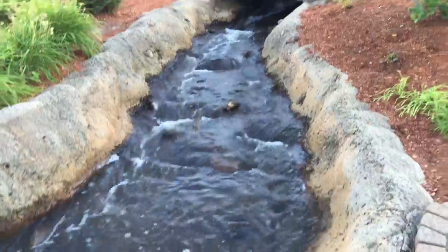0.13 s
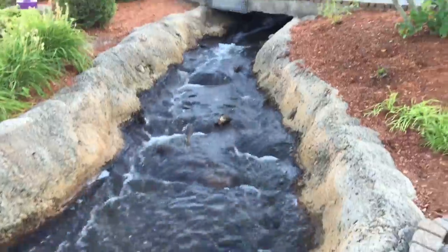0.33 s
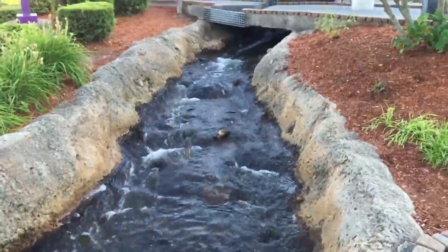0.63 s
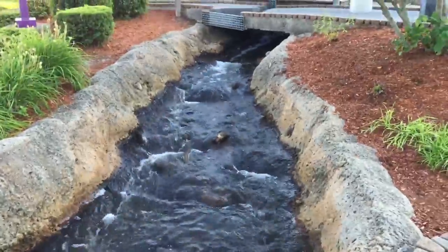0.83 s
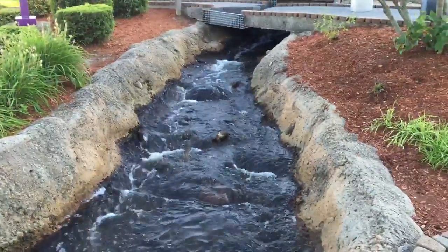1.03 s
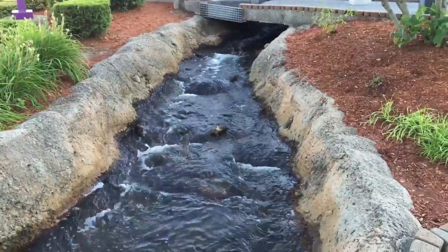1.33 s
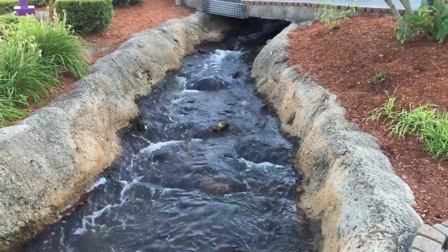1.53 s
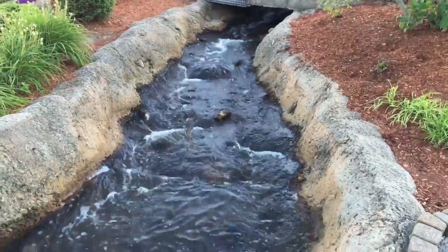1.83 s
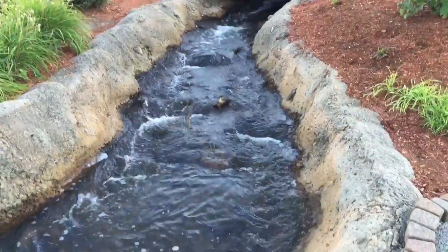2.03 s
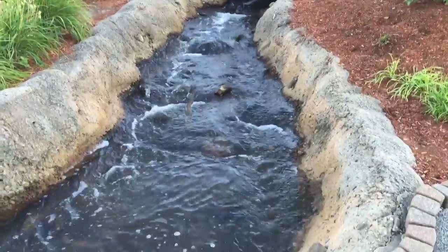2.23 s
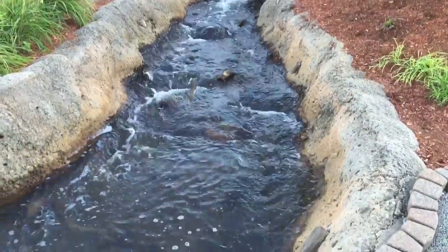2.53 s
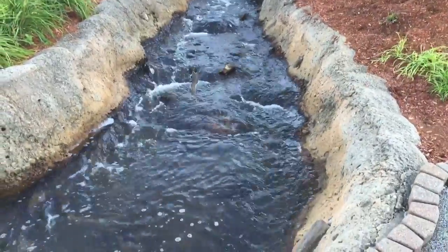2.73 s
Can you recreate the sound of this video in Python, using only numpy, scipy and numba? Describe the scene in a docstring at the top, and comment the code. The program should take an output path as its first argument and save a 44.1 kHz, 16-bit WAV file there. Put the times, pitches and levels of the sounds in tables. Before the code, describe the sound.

Stream water rushes steadily between rocks, with small gurgles and soft handling thumps at the microphone.

```python
"""Water runs down a shallow concrete stream between rocks, a few metres from a hand-held mono phone.
Its even rush is filtered noise and dense tiny bursts; its bubbles are decaying sines rising in pitch.
Light wind is low noise with short pulsed swings at the microphone; two low drones are sines that waver.
The hand knocks the phone now and then: damped swings that fall in pitch. A short silence comes first."""
import sys
import numpy as np
from scipy import signal
from scipy.fft import rfft, irfft
from scipy.io import wavfile
from scipy.ndimage import uniform_filter1d
from numba import njit

SR = 44100
rng = np.random.default_rng(int(sys.argv[2]) if len(sys.argv) > 2 else 0)


def gain_from_db(level_db):
    """Turn a decibel level (scalar or array-like) into a linear amplitude factor."""
    decades = np.asarray(level_db, float) / 20
    return 10 ** decades


def generate_wav(sig):
    """Save sig (samples, or channels by samples) to the path in sys.argv[1] as 16-bit PCM at SR."""
    pcm = np.round(np.clip(np.atleast_2d(sig).T, -1, 1) * 32767).astype(np.int16)
    wavfile.write(sys.argv[1], SR, pcm)


N = 127008  # samples, 2.88 s


def unit(x):
    """Normalisation: divides a signal by its root mean square, so that its rms is 1."""
    return x / np.sqrt(np.mean(x ** 2))


def curve(table):
    """Linear interpolation: a (time [s], value) table read at every sample."""
    return np.interp(np.arange(N) / SR, *np.array(table, float).T)


def gains(table, hz):
    """Frequency response: amplitude gain of a (frequency [Hz], level [dB]) table, on a log pitch axis."""
    points_hz, points_db = np.array(table).T
    return gain_from_db(np.interp(np.log(hz + 1), np.log(points_hz), points_db))


def walk(rate):
    """Slow random modulation: values held for 1 / rate seconds, smoothed twice, with rms 1."""
    hold = int(SR / rate)
    steps = np.repeat(rng.standard_normal(N // hold + 1), hold)
    smooth = uniform_filter1d(uniform_filter1d(steps, hold), hold)
    return unit(smooth[:N])


@njit
def rings(start, hz, cycles, glide, size, length):
    """Free damped oscillation: each bubble is an exponentially decaying sine that rises in pitch."""
    out = np.zeros(length)
    for k in range(len(start)):
        n = cycles[k] * SR / hz[k]  # samples until the ring is cut off, at exp(-5)
        phase = 0.
        for i in range(min(int(n), length - start[k])):
            phase += 2 * np.pi * hz[k] * (1 + glide * i / n) / SR
            out[start[k] + i] += size[k] * np.exp(-5 * i / n) * np.sin(phase)
    return out


def rush():
    """Superposition of random sources: noise and tiny bursts in bands that swell together and flicker alone."""
    # noise spectrum of the rush, relative: (frequency [Hz], density [dB per Hz])
    spectrum = [(240, -16), (400, -8), (495, -6), (543, -3.5), (693, -1.5), (1110, -1), (1470, 0.5),
                (3240, -5.5), (4500, -8.5), (4900, -11.5), (5400, -9), (6160, -8.5), (7630, -11.5),
                (9160, -10), (10000, -13), (10450, -16), (11000, -13), (13200, -13.5), (15300, -16.5)]
    # flow of the water, used as departures from its mean: (time [s], level [dB])
    flow_table = [(0.1, -37.5), (0.16, -38.5), (0.9, -37.5), (1.47, -38.5), (2.24, -36.5), (2.43, -38),
                  (2.88, -38)]
    level_db, fizz_per_s, fizz_scatter_db = -35.5, 6000, 1.5
    fizz_share = 0.24  # of the power; the rest is hiss
    swell_db, flicker_db = .5, .8  # rms

    draws = rng.random((int(fizz_per_s * N / SR), 3))
    places = (draws[:, 0] * N).astype(int)
    signs = np.sign(draws[:, 1] - .5)
    sizes = gain_from_db(-fizz_scatter_db * np.log(1 - draws[:, 2]))
    fizz = np.bincount(places, signs * sizes, N)
    hiss = rng.standard_normal(N)
    source = np.sqrt(fizz_share) * unit(fizz) + np.sqrt(1 - fizz_share) * hiss

    hz = np.arange(N // 2 + 1) * SR / N
    shaped = rfft(source) * gains(spectrum, hz)
    out, swell = 0, swell_db * walk(12)
    for octave in np.arange(7.5, 14.6, .5):  # log2 of the band centre in Hz
        window = np.cos(np.pi * np.clip(np.log2(hz + 1) - octave, -.5, .5)) ** 2
        band = irfft(shaped * window, N)
        out = out + band * gain_from_db(swell + flicker_db * walk(10))
    flow = curve(flow_table)
    return unit(out) * gain_from_db(level_db + flow - flow.mean())


def bubbles():
    """Bubble resonance: many small bubbles, spread evenly in log pitch, and a few louder single ones."""
    # louder single bubbles: (start [s], level [dB], starting pitch [Hz], ring [s])
    plops = [(.645, -33, 1986, 0.055), (.795, -37, 1860, .05), (.8, -33, 803, .04),
             (.905, -33.5, 1745, .09), (1.078, -33, 1980, 0.045), (1.56, -28.5, 804, 0.038),
             (1.685, -33, 1640, .04), (1.945, -29, 680, 0.032), (2.01, -39, 560, 0.071),
             (2.05, -39, 810, .04), (2.16, -32.5, 700, 0.058), (2.41, -33, 760, 0.053)]
    # liveliness of the gurgling, added to the small bubbles' level: (time [s], level [dB])
    gurgle = [(.1, -0.5), (.5, -2), (.85, -0.5), (1.2, 0.5), (1.55, -1), (1.8, -0.5), (2.0, 0), (2.25, 2.5),
              (2.5, -1.5), (2.88, 0)]
    per_s, low_hz, high_hz, mean_cycles = 500, 560, 6020, 26
    level_db, scatter_db, loudest_db = -43.5, 2, 8  # scatter and limit come before scaling to rms 1
    small_glide, plop_glide = .15, 0.009  # relative rise in pitch over one ring

    draws = rng.random((int(per_s * N / SR), 4))
    start = (draws[:, 0] * N).astype(np.int64)
    pitch = low_hz * (high_hz / low_hz) ** draws[:, 1]
    cycles = mean_cycles * (.5 + draws[:, 2])
    size = gain_from_db(np.minimum(-scatter_db * np.log(1 - draws[:, 3]), loudest_db))
    small = rings(start, pitch, cycles, small_glide, size, N)

    s, db, hz, ring = np.array(plops, float).T
    single = rings((s * SR).astype(np.int64), 1. * hz, hz * ring, plop_glide, gain_from_db(db), N)
    return unit(small) * gain_from_db(level_db + curve(gurgle)) + single


def wind():
    """Turbulent pressure: fluttering low noise, and single eddies that swing the diaphragm briefly."""
    # noise spectrum of the wind on the microphone, relative: (frequency [Hz], density [dB per Hz])
    spectrum = [(13, -57), (22, -5), (69, -0.5), (113, -11), (134, -15.5), (171, -8), (249, -14.5),
                (480, -29), (620, -43), (1060, -120)]
    # strength of the wind, before the lift below: (time [s], level [dB])
    breeze = [(0.12, -40.5), (0.26, -43.5), (0.33, -43.5), (0.63, -40.5), (0.8, -40), (0.95, -40),
              (1.66, -39.5), (1.76, -42.5), (2.16, -41.5), (2.37, -44), (2.51, -43), (2.76, -41.5),
              (2.88, -41)]
    # buffets under Gaussian envelopes: (centre [s], peak [dB], frequency [Hz], half-length to 1/e [s])
    buffets = [(.09, -22.5, 91, 0.011), (.14, -21, 84, 0.0083), (0.271, -19.5, 85.4, 0.0069),
               (.305, -19, 60.4, 0.0067), (0.412, -25, 55.4, 0.025), (0.496, -20, 80, 0.019),
               (.521, -13.5, 76.4, 0.0054), (0.867, -28, 52.7, 0.044), (0.952, -25.5, 64.7, 0.0099),
               (1.013, -22.5, 65, 0.013), (1.092, -16, 80, 0.0091), (1.344, -26, 93, 0.021),
               (1.456, -14.5, 80, 0.0078), (1.481, -24.5, 80, 0.0068), (1.74, -22.5, 81.6, 0.035),
               (1.82, -28, 167, 0.0088), (1.94, -35.5, 166.6, 0.024), (2.115, -34.5, 171, 0.0084),
               (2.139, -28.5, 70.6, .04), (2.489, -25.5, 61, 0.038)]
    lift_db, flutter_db = 5, 2  # flutter is rms

    hz, t = np.arange(N // 2 + 1) * SR / N, np.arange(N) / SR
    noise = irfft(rfft(rng.standard_normal(N)) * gains(spectrum, hz), N)
    rumble = unit(noise * gain_from_db(flutter_db * walk(20)))
    eddies = 0
    for s, db, f, long in buffets:
        envelope = np.exp(-((t - s) / long) ** 2)
        eddies = eddies - gain_from_db(db) * envelope * np.cos(2 * np.pi * f * (t - s))
    return rumble * gain_from_db(curve(breeze) + lift_db) + eddies


def drone(hz, waver_hz, level, db):
    """Frequency modulation: a sine whose pitch wavers at random by waver_hz rms, with a moving level."""
    phase = 2 * np.pi * np.cumsum(hz + waver_hz * walk(9)) / SR
    return np.sqrt(2) * np.sin(phase) * gain_from_db(curve(level) + db)


def drones():
    """Superposition of tones: a low and a higher drone, each wavering on its own."""
    # level of each drone, before the offset given with it: (time [s], level [dB])
    low_level = [(0.12, -42), (0.21, -49), (0.25, -33), (0.42, -60), (0.46, -39), (0.98, -46.5),
                 (1.09, -38), (1.18, -47), (1.37, -31.5), (1.56, -42.5), (1.75, -29), (1.81, -41.5),
                 (2.04, -54), (2.47, -31), (2.62, -69), (2.68, -35.5), (2.8, -34.5), (2.88, -38)]
    high_level = [(0.12, -43), (0.5, -38.5), (0.53, -54), (0.67, -32.5), (0.73, -44), (0.84, -34),
                  (1.13, -50.5), (1.97, -51), (2.05, -71), (2.13, -38), (2.21, -52), (2.27, -42),
                  (2.39, -51), (2.43, -42), (2.69, -36), (2.74, -61), (2.78, -49), (2.88, -38.5)]
    low = drone(hz=102, waver_hz=2.41, level=low_level, db=0.5)
    high = drone(hz=160, waver_hz=5.29, level=high_level, db=-1)
    return low + high


def knocks():
    """Impulse response of a damped body: each soft push on the phone is one swing that falls in pitch."""
    # knocks of the hand: (start [s], peak [dB], starting pitch [Hz], cycles at that pitch to fall to 1/e)
    pushes = [(.1045, -12.5, 259, 0.56), (0.2928, -12.5, 320, 1.16), (1.33, -30, 250, 0.86),
              (1.739, -19.5, 240, 0.74), (2.287, -19, 225, 1.4)]
    rise_s, sag_s = 0.00064, 0.0045  # after sag_s the pitch has halved
    out = 0
    for s, db, hz, cycles in pushes:
        t = np.maximum(np.arange(N) / SR - s, 0)
        envelope = (1 - np.exp(-t / rise_s)) * np.exp(-t * hz / cycles)
        swing = envelope * np.sin(2 * np.pi * hz * sag_s * np.log(1 + t / sag_s))
        out = out + gain_from_db(db) * swing / np.abs(swing).max()
    return out


def scene():
    """Linear superposition: all source pressures add at one microphone, the same in both channels."""
    tones = drones()
    mono = rush() + bubbles() + wind() + tones + knocks()
    return np.array([mono, mono])


def roll_off(x):
    """The treble ends steeply here."""
    return signal.sosfilt(signal.butter(12, 16290, fs=SR, output="sos"), x)


def record(dry):
    """Band limitation: the phone loses the deepest bass and the top, and is silent at first."""
    start_s, mic_low_hz, top_hz = .0838, 38, 15290
    bass_cut = signal.butter(3, mic_low_hz, "high", fs=SR, output="sos")
    top_cut = signal.ellip(12, .2, 60, top_hz, fs=SR, output="sos")  # .2 dB ripple, 60 dB stopband
    sounding = np.arange(N) >= start_s * SR
    heard = signal.sosfilt(bass_cut, dry) * sounding
    return roll_off(signal.sosfilt(top_cut, heard))


dry = scene()
out = record(dry)
generate_wav(out)
```